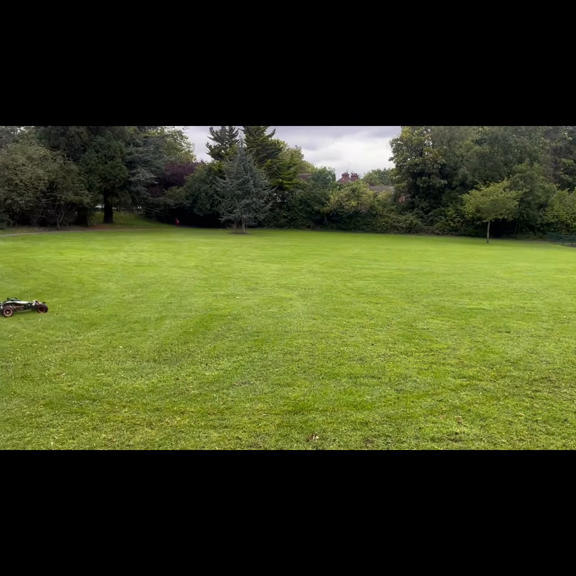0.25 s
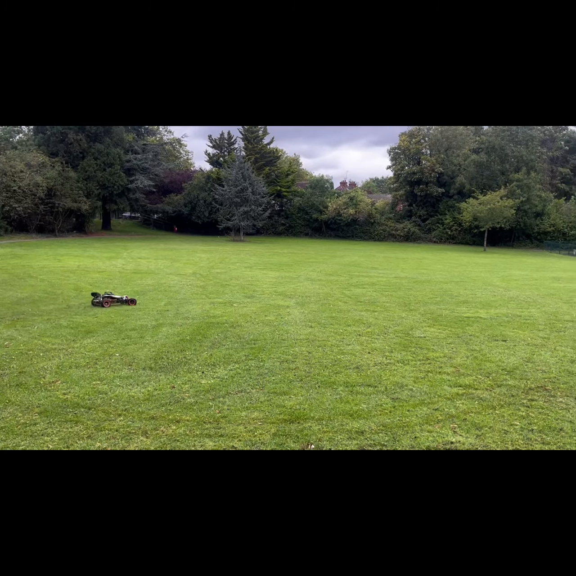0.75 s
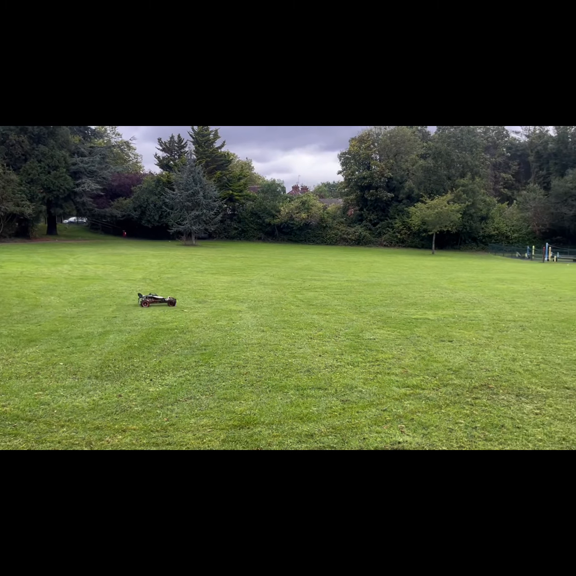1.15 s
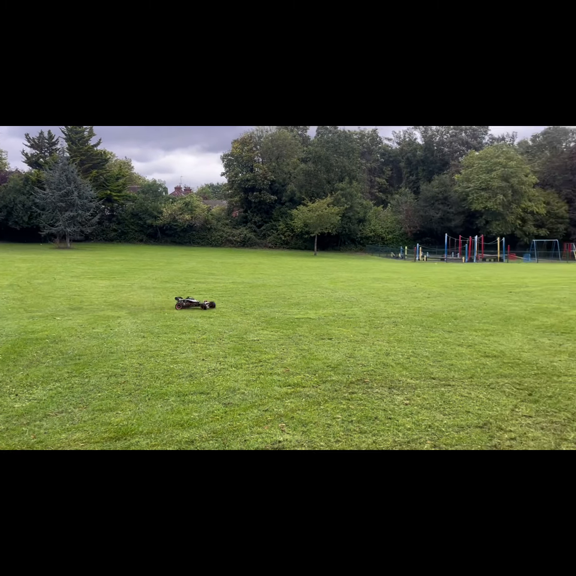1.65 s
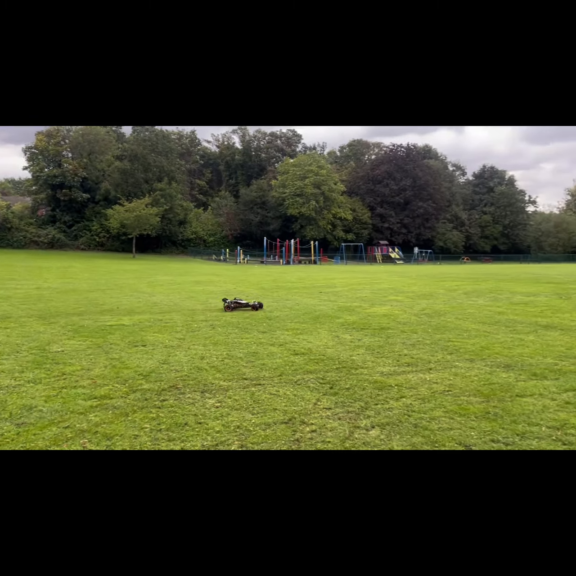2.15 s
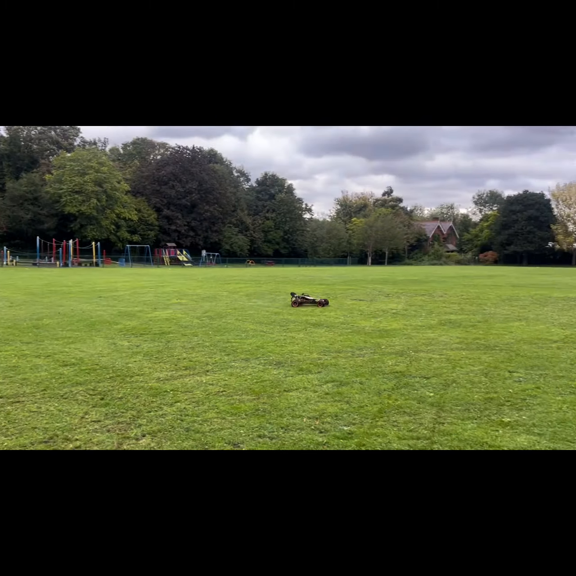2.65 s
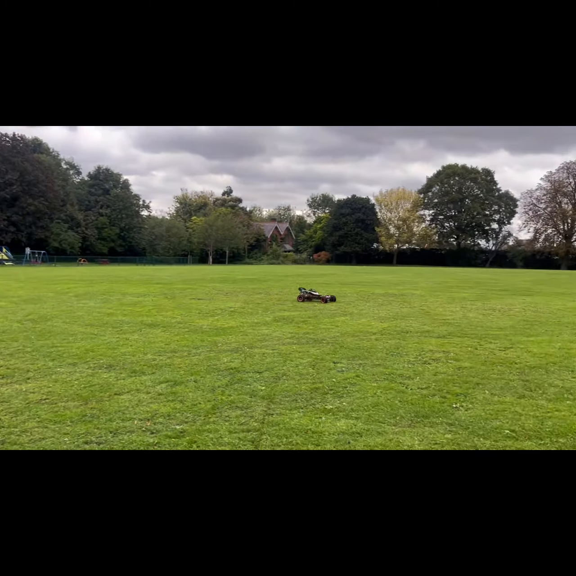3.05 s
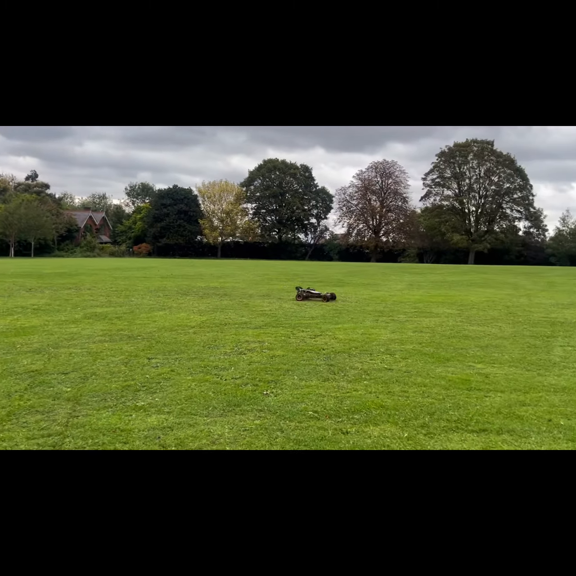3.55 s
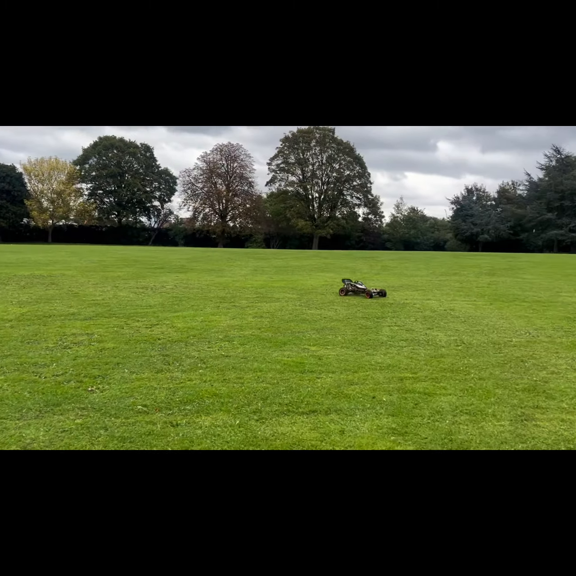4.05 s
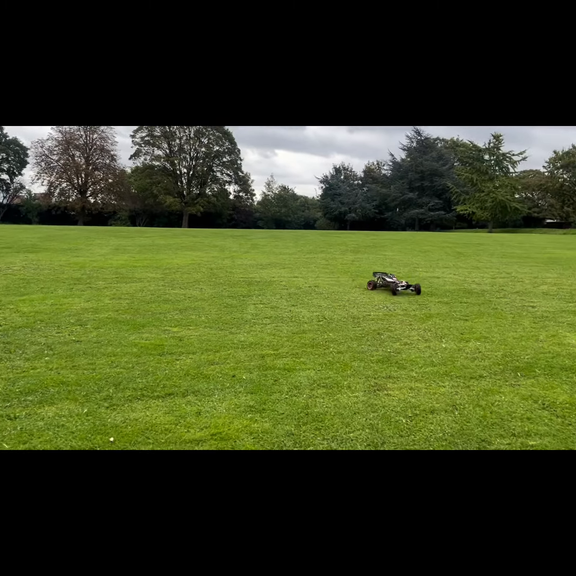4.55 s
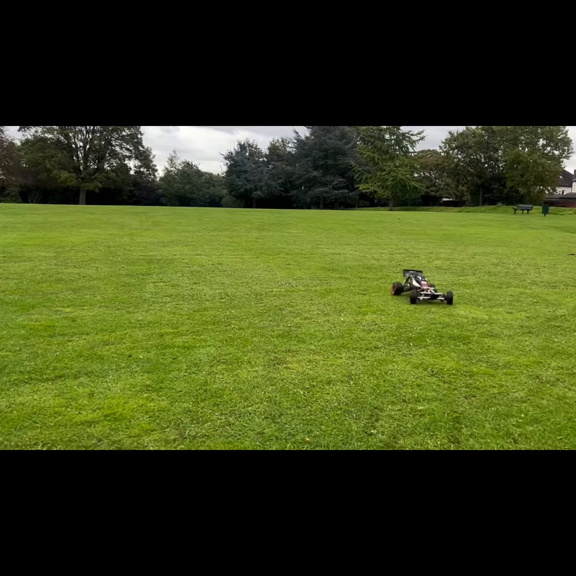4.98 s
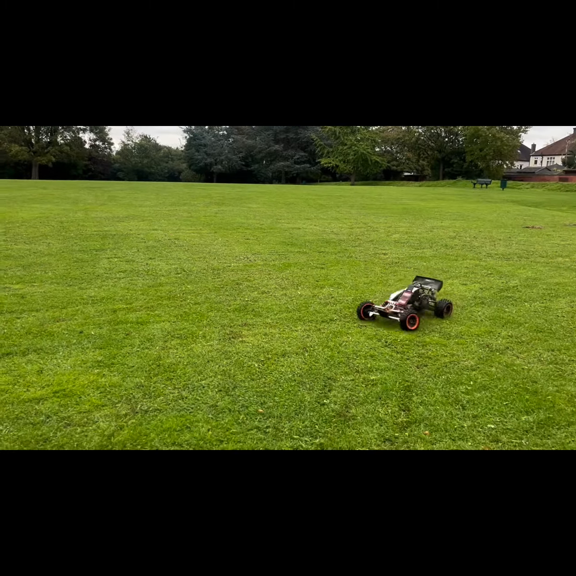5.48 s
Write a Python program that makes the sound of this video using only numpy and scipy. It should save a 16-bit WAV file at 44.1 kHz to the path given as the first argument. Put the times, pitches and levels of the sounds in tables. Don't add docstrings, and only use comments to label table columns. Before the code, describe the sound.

Harsh, buzzing petrol model engine blipped on and off outdoors. Each burst snaps on in a fast upward zip, holds a nasal, barking rasp, then shuts abruptly into a much quieter, sinking putter with slight metallic ringing and occasional cracks. Far off during the middle bursts, a little nearer at the end. Dry, open field, with soft air and distant low machinery hum; phone-like stereo pickup.

```python
import sys
import numpy as np
from scipy import signal
from scipy.fft import rfft, irfft, next_fast_len
from scipy.io import wavfile
from scipy.ndimage import map_coordinates

SR = 44100
rng = np.random.default_rng(int(sys.argv[2]) if len(sys.argv) > 2 else 0)


def voltage_ratio(decibels):
    exponent = np.asarray(decibels, float) / 20
    return 10 ** exponent


def int16_out(signal):
    q = np.round(np.clip(np.atleast_2d(signal).T, -1, 1) * 32767)
    wavfile.write(sys.argv[1], SR, q.astype(np.int16))


N = 252252
GRIP_HZ = 173
CATCH_S = .005


def unit(x):
    return x / np.sqrt(np.mean(x ** 2) + 1e-20)


def along(points, hz):
    f, v = np.transpose(points)
    return np.interp(np.log(hz + 1), np.log(f + 1), v)


def curves(rows):
    s, *cols = np.transpose(rows)
    return [np.interp(np.arange(N) / SR, s, c) for c in cols]


def wobble(rate_hz):
    knots = rng.standard_normal(int(N * rate_hz / SR) + 4)
    return map_coordinates(knots, [np.arange(N) * rate_hz / SR])


def filtered(x, response):
    m = next_fast_len(N + 8192)
    return irfft(rfft(x, m) * response(np.fft.rfftfreq(m, 1 / SR)), m)[..., :N]


def ringing(hz, gain, mode_hz, width_hz):
    return 1 + gain * 1j * hz * width_hz / (mode_hz ** 2 - hz ** 2 + 1j * hz * width_hz)


def pulses(at, sizes):
    near = np.floor(at)[:, None] + np.arange(-7, 9)
    away = near - at[:, None]
    shape = np.sinc(away) * np.cos(np.pi * away / 18) ** 2
    index = np.clip(near, 0, N).astype(int)
    return np.bincount(index.ravel(), (sizes[:, None] * shape).ravel(), N + 1)[:N]


def echoed(x, tail_db, t60, count, even=0):
    t = np.arange(1024) / SR
    hop = N // count + 1
    fade = np.sin(np.pi * np.arange(2 * hop) / (2 * hop))
    padded = np.pad(x, (hop, 2 * hop))
    rattle = np.zeros(N + 3 * hop + len(t))
    for k, noise in enumerate(rng.standard_normal((count + 1, len(t)))):
        tail = noise * voltage_ratio(-60 * t / t60)
        whole = 1 + rfft(tail) / np.linalg.norm(tail) * voltage_ratio(tail_db)
        flatten = (np.sqrt(1 + voltage_ratio(2 * tail_db)) / (abs(whole) + .1)) ** even
        tail = irfft(whole * flatten - 1)
        piece = signal.fftconvolve(padded[k * hop:][:2 * hop] * fade, tail)
        rattle[k * hop:][:len(piece)] += piece
    return rattle[hop:][:N]


def banded(x, colour, low_hz):
    def cut(hz, edge_hz):
        return 1 / np.sqrt(1 + (edge_hz / (hz + 1)) ** 12)

    def lag(hz):
        return np.exp(-2j * np.pi * .0002 * hz * (np.log(16000 / (hz + 1)) + 1) - .4j)

    def bands(hz):
        drone = np.sqrt(1 - cut(hz, 1245) ** 2)
        shell = cut(hz, 1480) * np.sqrt(1 - cut(hz, 2430) ** 2)
        bark = cut(hz, 2144)
        return voltage_ratio(along(colour, hz)) * cut(hz, low_hz) * lag(hz) * np.array([drone, shell, bark])

    hz = np.linspace(1, 16000, 4000)
    norm = np.sqrt(np.sum(abs(bands(hz)) ** 2, 1) * (hz[1] - hz[0]) / SR * 2)[:, None]
    return filtered(x, lambda hz: bands(hz) / norm)


# time in seconds, 0 leaving / 1 crossing far off / 2 turning in / 3 facing.
HEADING = [
    (0, 0),
    (.7, 0),
    (1.1, .55),
    (1.6, 1),
    (3.9, 1),
    (4.35, 2),
    (4.7, 2),
    (5.45, 3),
]


def engine():
    speed = revs()
    firing_db, coast_db = reach(speed)
    locked = np.sqrt(np.clip(np.log2(speed / GRIP_HZ), 0, .1))
    speed = speed * (1 + shudder() + .038 * locked * wobble(45))
    turns = crank(speed)
    at = np.interp(np.arange(1, int(turns[-1])), turns, np.arange(N))
    chance = rng.standard_normal((len(at), 2))
    gap = np.sqrt(SR / speed)
    puff = 1 + .5 * np.cos(2 * np.pi * (turns - .05))
    heading, = curves(HEADING)
    voices = exhaust(at, chance, gap, puff, heading)
    idling = coasting_engine(at, chance, gap, puff, heading)
    gas = throttle()
    firing, coasting = gas * voltage_ratio(firing_db), (1 - gas) * voltage_ratio(coast_db)
    first_order = np.sqrt(2) * (firing[3] + coasting[3]) * np.sin(2 * np.pi * turns)
    return np.sum(firing[:3] * voices + coasting[:3] * idling, 0) + first_order


def upper_modes(hz):
    return 1 / np.sqrt(1 + (1100 / (hz + 1)) ** 4)


def turbulence(colour, gate):
    return filtered(gate * rng.standard_normal(N), lambda hz: voltage_ratio(along(colour, hz)))


# frequency in Hz, level in dB.
GAS = [(200, -24), (1200, -18), (3000, -14), (8000, -8)]
# frequency in Hz, level in dB per Hz.
LEAVING = [(350, 1), (520, -5), (700, 5.5), (900, 5), (1100, -8), (1400, -6.0), (1800, -9.5), (2500, -12),
           (3600, -0.5), (5100, 0), (6500, -3.5), (8500, 5), (11000, -12.5), (14500, -17)]
CROSSING = [(350, 5), (520, -5), (700, 2.5), (900, 1.5), (1100, -20), (1400, 1), (1800, -9), (2500, -17),
            (3600, 2), (5100, -6), (6500, -0.5), (8500, -3), (11000, -22.5), (14500, -13.5)]
TURNING = [(350, -6), (520, -10), (700, -12.5), (900, -4), (1100, -26), (1400, 3.5), (1800, -4),
           (2500, -9.5), (3800, 3.5), (5100, -8.5), (6500, -11), (8500, -0.5), (11000, -18), (14500, -18.5)]
FACING = [(350, -2.5), (520, -11), (700, -1), (880, -5.5), (1050, -18.5), (1400, -5.5), (1920, -3.5),
          (2600, -14.5), (3500, 0), (4800, -13), (6500, -11), (8500, -9.5), (11000, -20), (14500, -21)]


def exhaust(at, chance, gap, puff, heading):
    firing = gap * pulses(at + .25 * chance[:, 0], voltage_ratio(.5 * chance[:, 1]))
    rattle = filtered(echoed(firing, tail_db=.5, t60=.04, count=18, even=.6), upper_modes)
    loud = firing + rattle + turbulence(GAS, puff)
    grazing = filtered(loud, lambda hz: 1 - .95 / (1 + ((hz - 5150) / 220) ** 2))
    grazing = filtered(grazing, lambda hz: ringing(hz, 1.2, mode_hz=925, width_hz=110))
    glare = filtered(loud, lambda hz: ringing(hz, 1.3, 1930, 120) * ringing(hz, 1.2, 2280, 150))
    sides = [(loud, LEAVING), (grazing, CROSSING), (loud, TURNING), (glare, FACING)]
    voices = 0
    for k, (x, colour) in enumerate(sides):
        share = np.clip(1 - abs(heading - k), 0, 1)
        voices = voices + share * banded(x, colour, low_hz=243)
    return voices


# frequency in Hz, level in dB.
LEAK = [(200, -10), (1200, -8), (3000, -4), (8000, 0)]
# frequency in Hz, level in dB per Hz.
COASTING = [(200, -6), (350, -7.5), (600, -8), (1000, -15), (1300, -6), (1750, -5), (2500, -18),
            (3600, -3.5), (4600, -9.5), (5500, -16), (7000, -10.5), (8500, -7), (11000, -28), (14500, -27)]
COASTING_NEAR = [(200, -10), (350, -3), (600, -2), (1050, -6), (1400, 5), (1750, -1.5), (2500, -3),
                 (3600, 2), (4600, -6), (5500, -19), (7000, -28), (8500, -16), (11000, -28), (14500, -28)]


def coasting_engine(at, chance, gap, puff, heading):
    pumping = gap * pulses(at + .7 * chance[:, 0], voltage_ratio(1.8 * chance[:, 1]))
    rattle = filtered(echoed(pumping, tail_db=-3, t60=.025, count=24, even=.6), upper_modes)
    soft = .8 * pumping + rattle + turbulence(LEAK, puff * voltage_ratio(1.5 * wobble(25) - 2))
    soft = filtered(soft, lambda hz: np.exp(4j * np.sin(2 * np.pi * hz / 1100)))
    fits = voltage_ratio(4 * wobble(13) - 3)
    soft = soft + filtered(fits * soft, lambda hz: ringing(hz, 1.4, mode_hz=1730, width_hz=80) - 1)
    facing = filtered(soft, lambda hz: ringing(hz, 3.1, mode_hz=1060, width_hz=47))
    near = np.clip((heading - 1) / 2, 0, 1)
    far_voice = (1 - near) * banded(soft, COASTING, low_hz=200)
    return far_voice + near * banded(facing, COASTING_NEAR, low_hz=177)


# from in seconds, to in seconds.
THROTTLE = [
    (-.1, .665),
    (1.0304, 2.28),
    (3.0455, 3.51),
    (3.7588, 3.915),
    (4.367, 4.615),
    (5.3447, 5.8),
]


def throttle():
    t = np.arange(N) / SR
    close_s = .032
    return sum(np.clip((t - a) / CATCH_S, 0, 1) * np.clip((b - t) / close_s, 0, 1) for a, b in THROTTLE)


# spin-up in turns per s per s, then drone, shell and first order
# in dB re bark, shell swell in dB per s as the body turns.
BURSTS = [(621.3, -11, -6, -11, -4), (705.4, -12.5, -10.5, -11, -4.5), (649, -15, -12.5, -10, -1),
          (638, -18, -13.5, -12, -1), (738, -9.5, -21, -9, 5), (743, -3, -15.5, -8.5, 28)]
# quick drop in turns per s, rest speed in turns per s, settling in seconds.
RUNDOWNS = [(14.36, 85, .24), (45.08, 70, .62), (25.89, 80, .28), (12.16, 97, .23), (16.78, 84, .3),
            (16, 78, .3)]
# time in seconds, speed in turns per s.
HELD = [(0, 172.8), (.64, 172), (1.13, 170.7), (1.516, 178.5), (1.62, 195.5), (1.772, 200.7),
        (2.016, 213.7), (2.048, 224.5), (2.102, 229.9), (2.27, 232.4), (3.158, 171.7), (3.26, 176.3),
        (3.432, 192.9), (3.5, 192.1), (3.86, 170), (4.47, 175), (4.6, 173.3), (5.47, 175)]


def revs():
    start_hz, brake_hz_per_s = 75, 700
    knee = 30
    lift_s = .012
    t, (held,) = np.arange(N) / SR, curves(HELD)
    speed = np.full(N, float(start_hz))
    for (a, b), (spin, *_), (drop, rest, settle_s) in zip(THROTTLE, BURSTS, RUNDOWNS):
        free = speed[max(round(a * SR), 0)] + spin * np.maximum(t - a, 0)
        pulled = (free ** -knee + held ** -knee) ** (-1 / knee)
        since = np.maximum(t - b + lift_s, 0)
        last = pulled[min(round((b - lift_s) * SR), N - 1)]
        quick = drop * np.exp(-since * brake_hz_per_s / drop)
        falling = rest + quick + (last - drop - rest) * np.exp(-since / settle_s)
        speed = np.where(t < a, speed, np.where(since > 0, falling, pulled))
    return speed


# time in seconds, speed dip in %.
JOLTS = [(1.33, .6), (1.42, .7), (1.5, 1.5), (1.543, 2.5), (1.67, 3), (1.755, 2.5), (1.83, 2), (1.87, -1.5),
         (2.02, 3.3), (2.16, 1), (3.245, 1.5), (3.425, 2.2), (3.465, .8)]


def shudder():
    t = np.arange(N) / SR
    torsion_hz, rise_s, decay_s = 22.5, .012, .07
    dips = 0
    for s, dip in JOLTS:
        envelope = np.exp(np.minimum((t - s) / rise_s, (s - t) / decay_s))
        dips = dips + dip * np.cos(2 * np.pi * torsion_hz * (t - s)) * envelope
    return -dips / 100 + .0028 * wobble(30)


def crank(speed):
    turns = np.cumsum(speed) / SR
    catch = np.array([max(a + CATCH_S, 0) for a, b in THROTTLE])
    late = turns[np.round(catch * SR).astype(int)]
    edges = np.ravel([(c, b) for c, (a, b) in zip(catch, THROTTLE)])
    return turns + np.interp(np.arange(N) / SR, edges, np.repeat(np.round(late) - late, 2))


# time in seconds, firing bark at grip speed in dB.
NEAR = [(0, -14.5), (.1, -18.5), (.55, -19), (.65, -23.5), (1.0, -24), (1.18, -20), (1.4, -23),
        (1.9, -26.5), (2.22, -26), (2.7, -27), (3.15, -24), (3.5, -26), (3.86, -25), (4.3, -25.5),
        (4.52, -24), (4.6, -27), (5.3, -22.5), (5.72, -22)]
# bark, drone, shell and first order in dB re firing bark,
# drone and shell swell in dB per s.
COASTS = [(-18, -19.5, -15.5, -27, -14), (-12.5, -21, -18, -25.5, -5.5), (-16.5, -23.5, -24.5, -26.5, 4),
          (-16, -24, -23, -26.5, 1), (-14, -23.5, -22.5, -23, 8.5), (-16, -9, -5, -25, -3)]
# drone, shell, bark, first order in dB per doubling of speed.
COAST_GROWS_DB = [2.5, 14, 12.1, 1.7]


def reach(speed):
    slipping_db, locked_db = [2.3, 8.5, 10.1, 9.3], [19.3, 18, 19.5, 9]
    bloom_db, bloom_s = -5, .04
    uneven_db = 1.2
    t, (opens, shuts) = np.arange(N) / SR, np.transpose(THROTTLE)
    which = np.searchsorted(opens, t) - 1
    near_db, = curves(NEAR)
    octaves = np.log2(speed / GRIP_HZ)

    _, drone, shell, first, swell = np.transpose(BURSTS)[:, which]
    since_open = t - opens[which]
    balance_db = np.array([drone, shell + swell * since_open, 0 * drone, first])
    growth_db = np.outer(slipping_db, np.minimum(octaves, 0)) + np.outer(locked_db, np.maximum(octaves, 0))
    firing_db = near_db + balance_db + growth_db + bloom_db * np.exp(-since_open / bloom_s)

    bark, drone, shell, first, swell = np.transpose(COASTS)[:, which]
    swell_db = swell * (t - shuts[which])
    balance_db = np.array([drone + swell_db, shell + swell_db, bark, first])
    wander_db = uneven_db * np.array([wobble(16) for _ in range(4)])
    coast_db = near_db + balance_db + np.outer(COAST_GROWS_DB, octaves) + wander_db
    return firing_db, coast_db


# time in seconds, peak in dB.
POPS = [(2.4894, -30), (2.5844, -33), (2.6399, -20), (2.6918, -29), (2.7004, -29), (2.7926, -30),
        (2.834, -20), (2.9194, -36), (4.2343, -34), (4.2921, -30), (4.3415, -28), (4.362, -26),
        (4.9671, -31), (4.9871, -32), (5.007, -28), (5.0374, -34), (5.0794, -30), (5.1657, -30),
        (5.1876, -32), (5.233, -27), (5.2674, -28), (5.3023, -28)]


def pops():
    s, db = np.transpose(POPS)
    cracks = pulses(s * SR, voltage_ratio(db + 5))
    cracks = cracks + echoed(cracks, tail_db=-3, t60=.02, count=20)
    return np.dot(voltage_ratio([-16, -8, 0]), banded(cracks, TURNING, low_hz=300))


# time in seconds, level in dB.
HUM = [(0, -43), (.5, -44), (.8, -48.5), (2, -48), (3.4, -56), (4.6, -64), (5.7, -57)]
# frequency in Hz, level in dB.
HUM_LINES = [(59, 3), (66.5, 3)]
# frequency in Hz, level in dB per Hz.
AIR = [(25, -20), (60, 3), (120, 3), (300, 0), (1000, -10), (4000, -34.5), (15000, -80)]


def background():
    t = np.arange(N) / SR
    tones = 0
    for hz, db in HUM_LINES:
        level = voltage_ratio(db + 2.9 * wobble(2.26))
        tones = tones + level * np.sin(2 * np.pi * hz * t + 5.4 * wobble(2.265))
    gusts = voltage_ratio(.72 * wobble(2.85)) * rng.standard_normal(N)
    air = filtered(gusts, lambda hz: voltage_ratio(along(AIR, hz)))
    return voltage_ratio(curves(HUM)[0]) * unit(tones) + voltage_ratio(-53) * unit(air)


# frequency in Hz, left lead in radians.
LEAD = [(100, .2), (900, .7), (1250, 2.2), (1620, 2.3), (1720, -.3), (3200, .6), (4900, 0), (5500, -1.05),
        (6800, -.9), (7850, -3.05), (9100, -3.22), (11300, -6.25), (12800, -6.35), (14700, -9.4)]
# frequency in Hz, left minus right in dB.
TILT = [(60, -.8), (300, 0), (520, 4), (900, 6.5), (1150, 10), (1500, -1.5), (2200, -.5), (3600, 1.5),
        (5600, -1.5), (7200, 1.5), (7900, 0), (15000, 0)]
# frequency in Hz, level in dB.
STRAY = [(100, -26), (800, -12), (1300, -6), (2200, -14), (5300, -8), (7200, -8), (7900, -27), (9200, -27),
         (10000, -5), (12000, -12), (13700, -5), (14800, -28)]


def scene():
    front = engine() + pops() + background()
    side = np.array([[1], [-1]])
    scatter = np.array([echoed(front, tail_db=-2, t60=.02, count=12) for _ in range(2)])
    shared = filtered(front, lambda hz: voltage_ratio(along(TILT, hz) / 2 * side) * np.exp(.5j * along(LEAD, hz) * side))
    return shared + filtered(scatter, lambda hz: voltage_ratio(along(STRAY, hz)))


def top_cut(x):
    return signal.sosfilt(signal.butter(12, 15750, fs=SR, output="sos"), x)


def record(dry):
    rounded = dry / (1 + abs(dry / .98) ** 5) ** (1 / 5)
    heard = filtered(rounded, lambda hz: 1 / np.sqrt((1 + (hz / 15600) ** 40) * (1 + (45 / (hz + 1)) ** 6)))
    return top_cut(heard)


dry = scene()
out = record(dry)
int16_out(out)
```